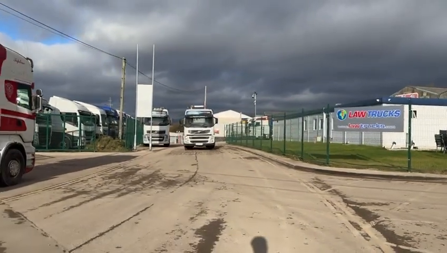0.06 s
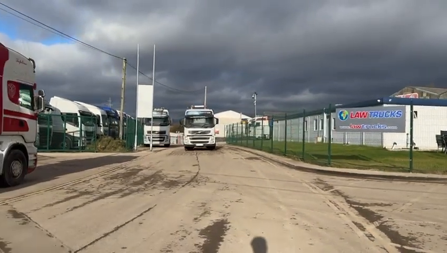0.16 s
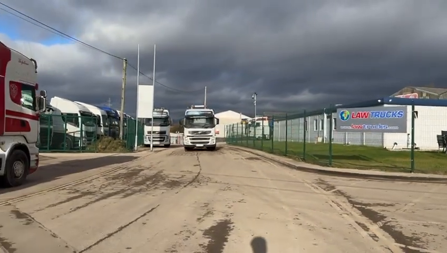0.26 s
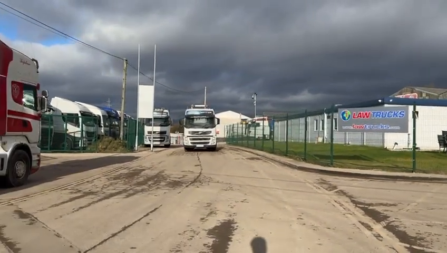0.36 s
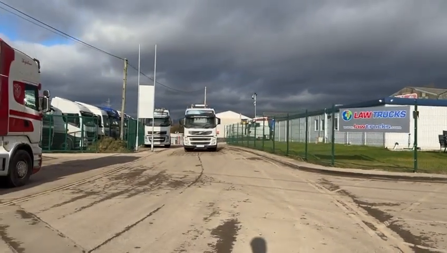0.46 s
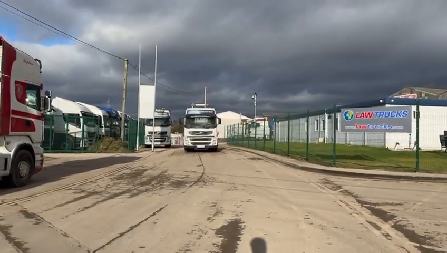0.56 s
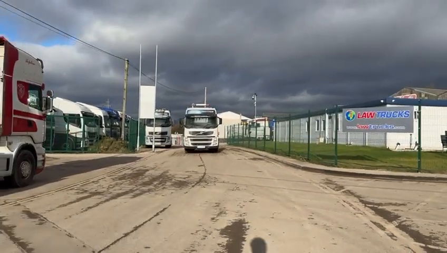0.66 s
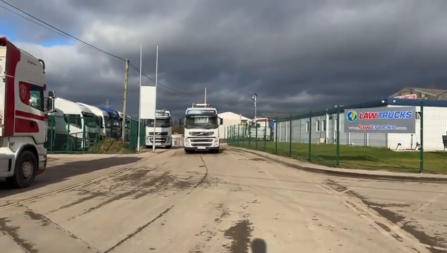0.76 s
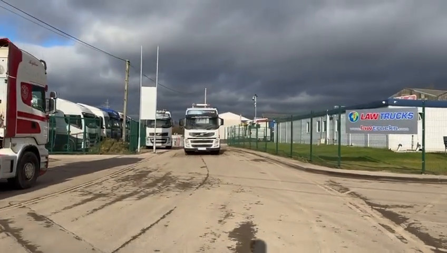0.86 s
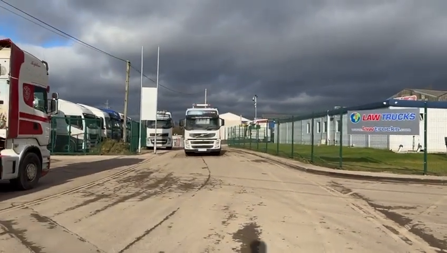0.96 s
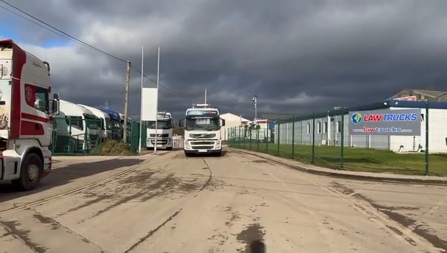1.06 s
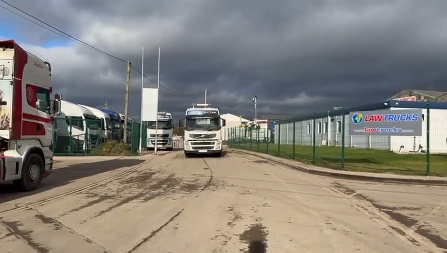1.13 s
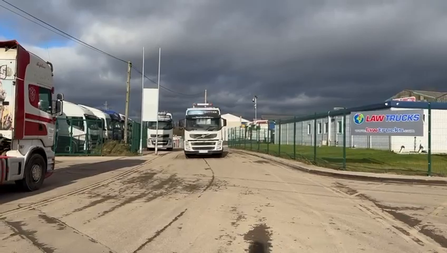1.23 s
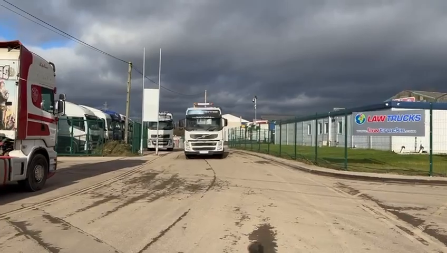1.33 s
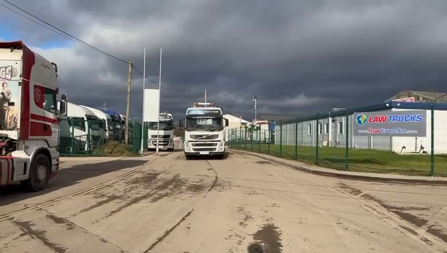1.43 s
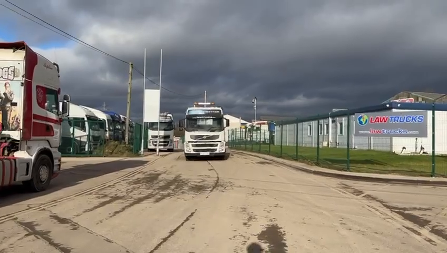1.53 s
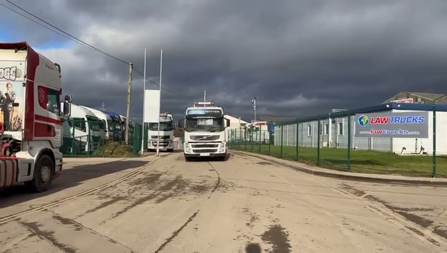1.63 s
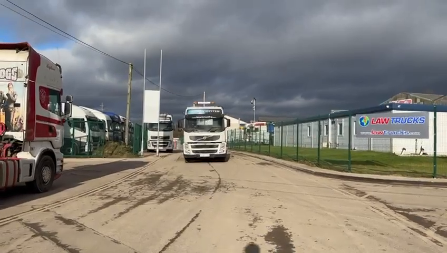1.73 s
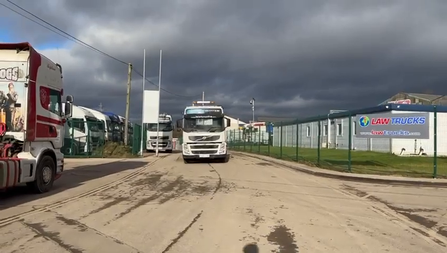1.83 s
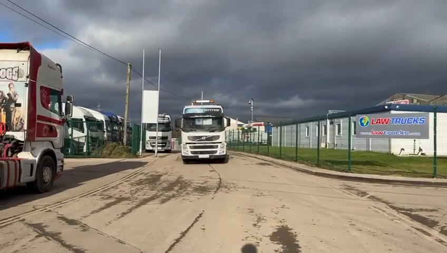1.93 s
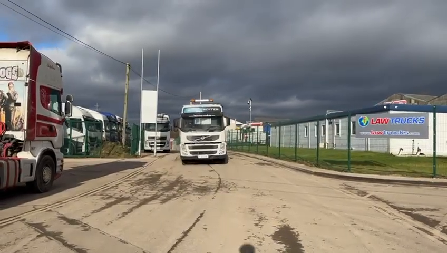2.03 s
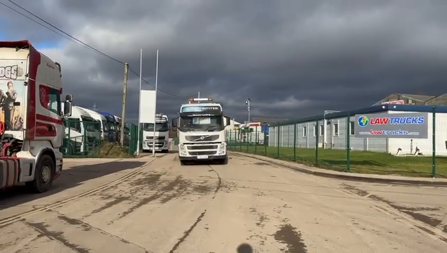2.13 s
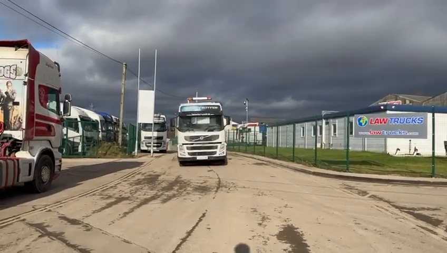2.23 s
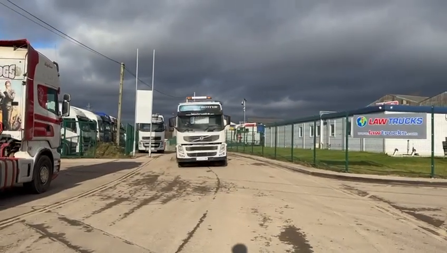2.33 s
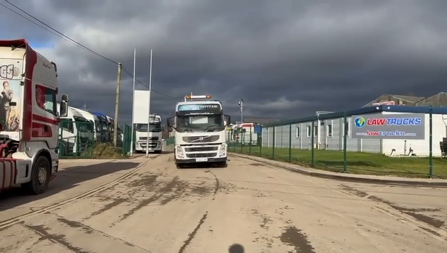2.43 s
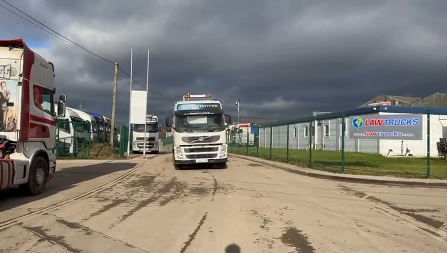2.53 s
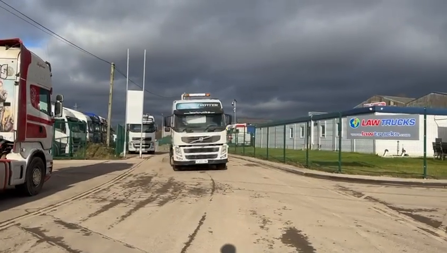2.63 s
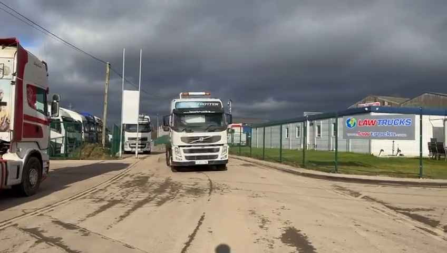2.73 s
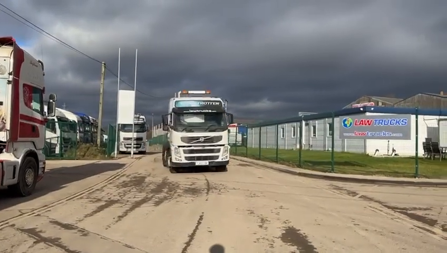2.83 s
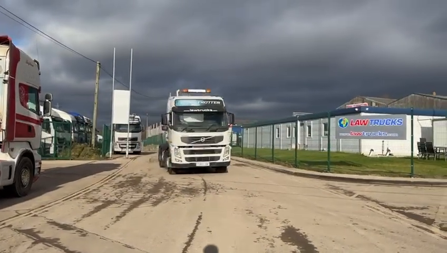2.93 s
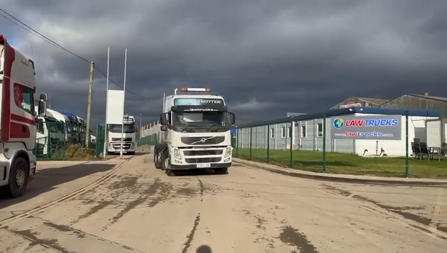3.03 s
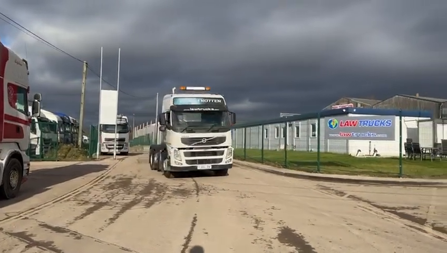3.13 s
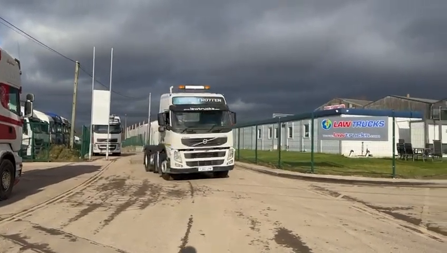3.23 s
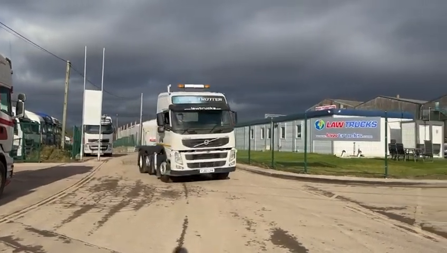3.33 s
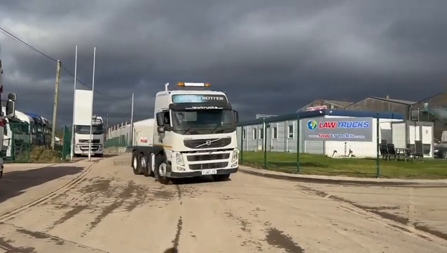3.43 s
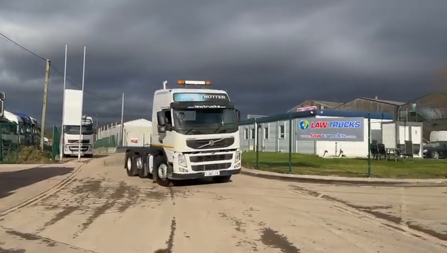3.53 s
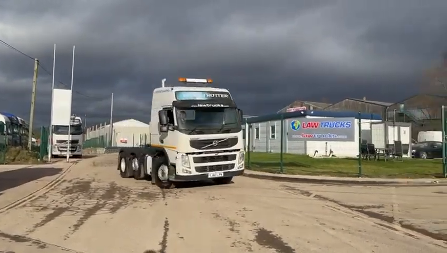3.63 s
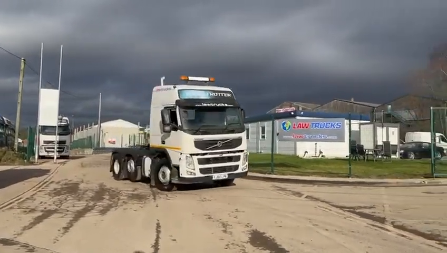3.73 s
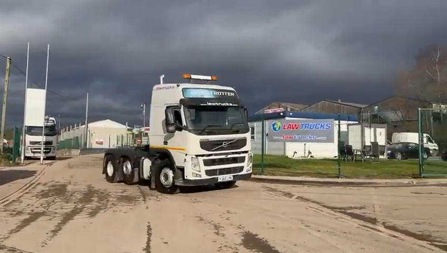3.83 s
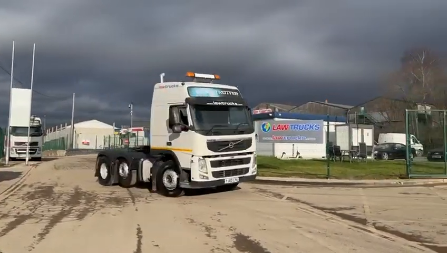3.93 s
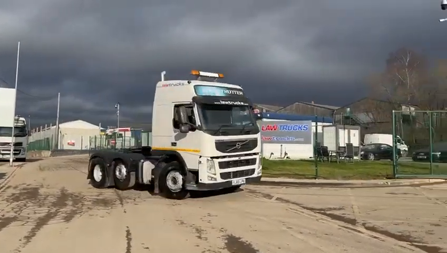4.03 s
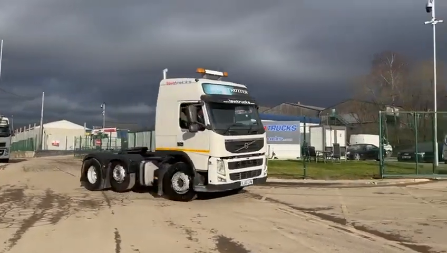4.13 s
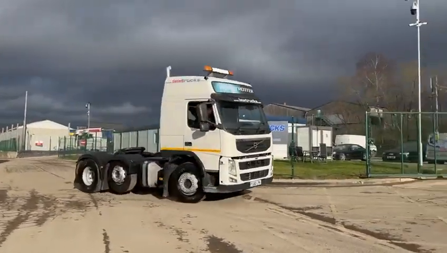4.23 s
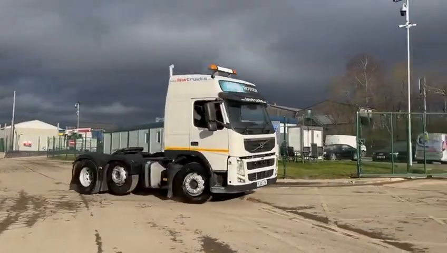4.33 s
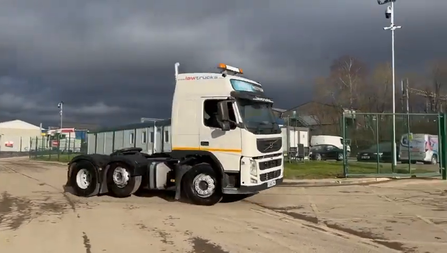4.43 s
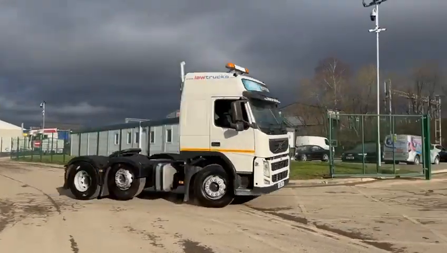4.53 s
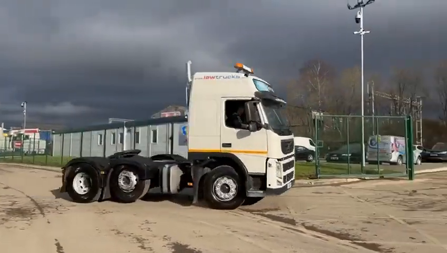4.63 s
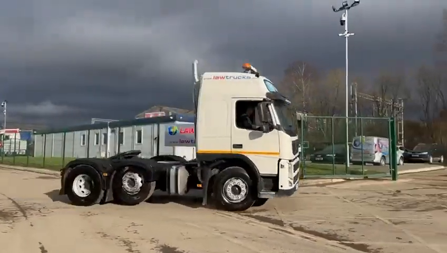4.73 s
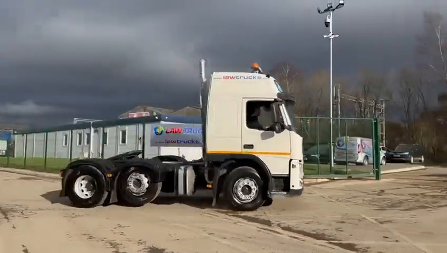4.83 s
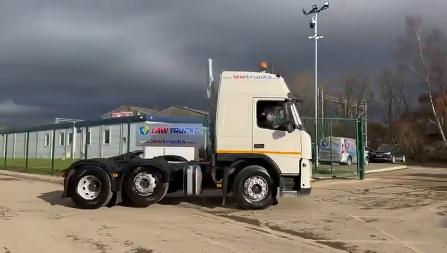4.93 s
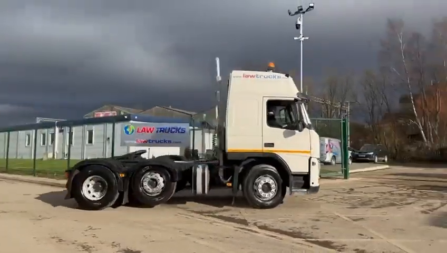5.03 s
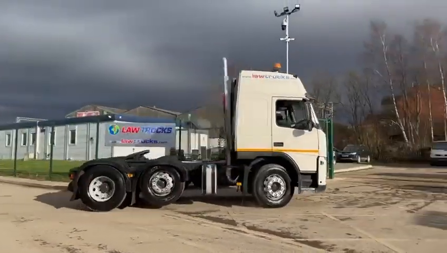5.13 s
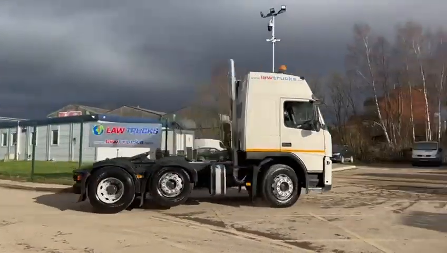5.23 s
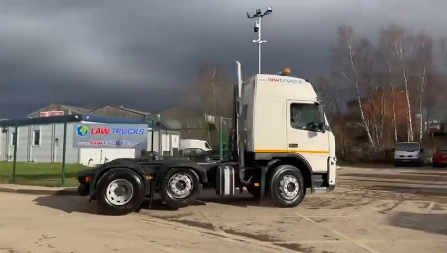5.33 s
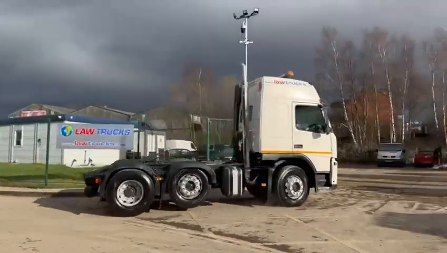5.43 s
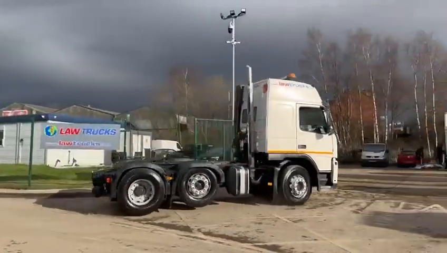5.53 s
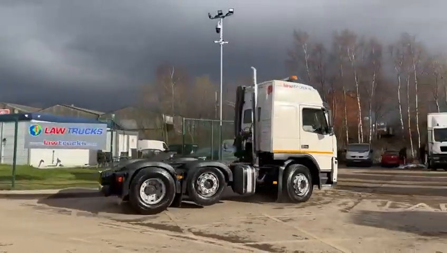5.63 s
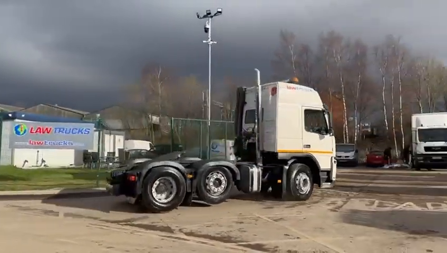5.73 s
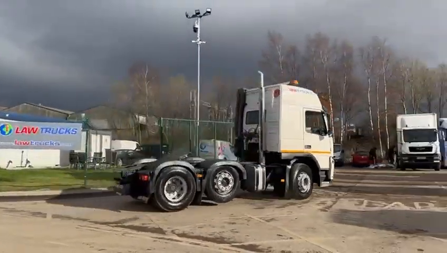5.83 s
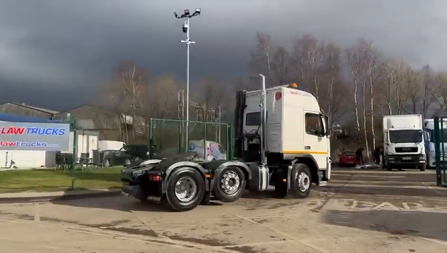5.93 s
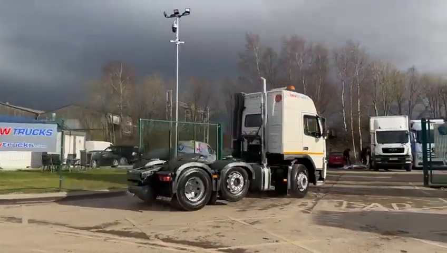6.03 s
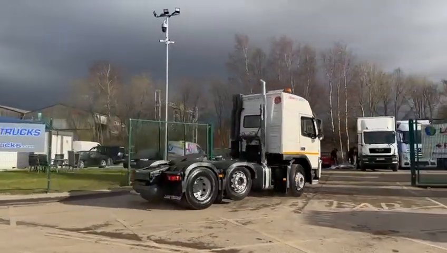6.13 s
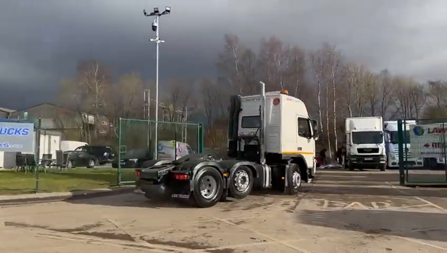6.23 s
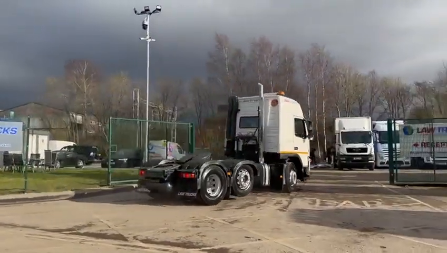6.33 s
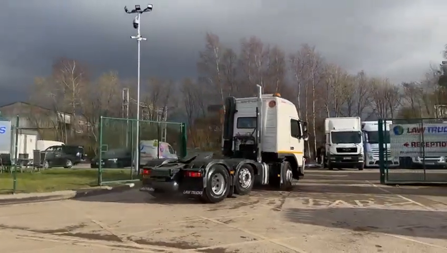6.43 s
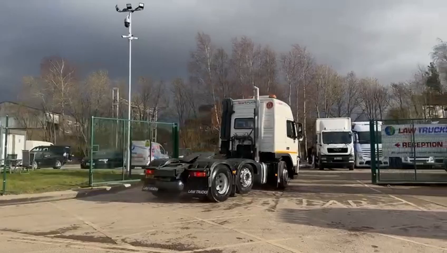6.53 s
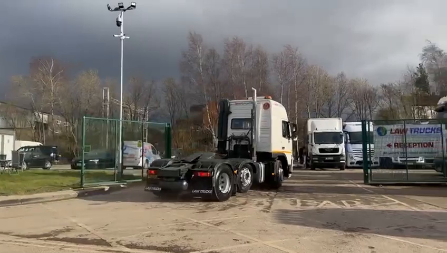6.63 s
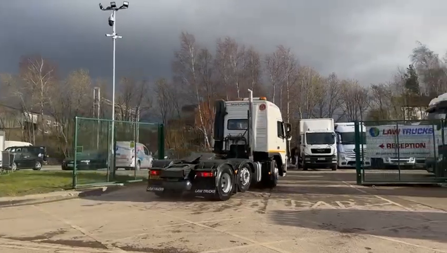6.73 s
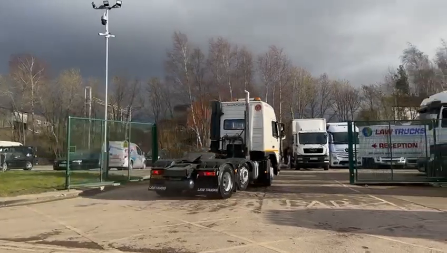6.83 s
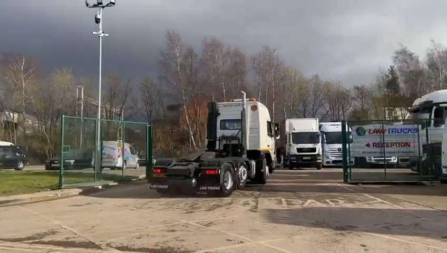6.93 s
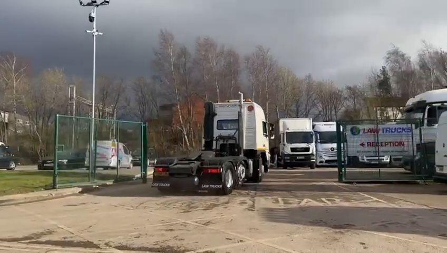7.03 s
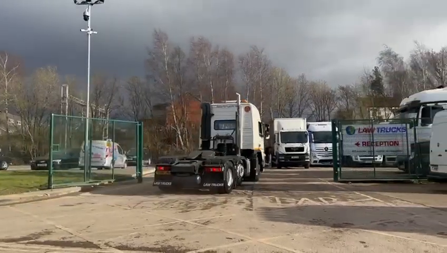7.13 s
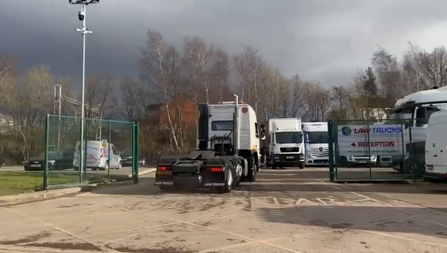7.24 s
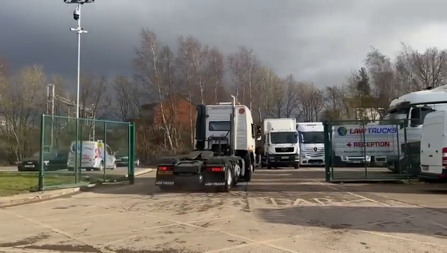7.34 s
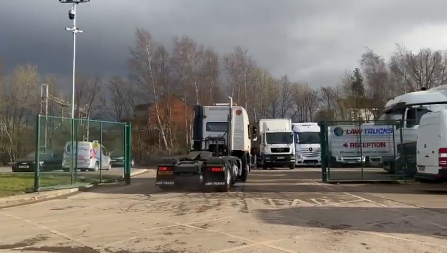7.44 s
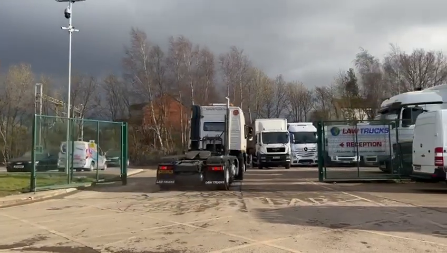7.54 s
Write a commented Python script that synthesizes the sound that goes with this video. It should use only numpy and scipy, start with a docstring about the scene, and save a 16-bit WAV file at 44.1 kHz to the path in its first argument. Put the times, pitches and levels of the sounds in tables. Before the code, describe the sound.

Outdoors in a concrete yard, a heavy diesel lorry approaches, revving hard in low gear. It eases off with sharp air hisses and two short, mid-pitched horn toots that slap back off sheds. Dull chassis knocks accompany a gear change, then the engine pulls strongly past a handheld stereo microphone about five metres away and slows as it leaves.

```python
"""Heard first: a diesel lorry driving hard in low gear; two toots and hisses of air; it passes and idles.
The yard is concrete, the closest distance about 5 m, and the microphone has two ports.
Engine and air are shaped noise bursts, hiss and gliding tones, with level set by distance and effort.
The horn is a stack of rough partials thrown back by sheds; chassis knocks are short noise thuds.
A low bed of tyres and breeze lies underneath."""
import sys
import numpy as np
from scipy import signal
from scipy.fft import rfft, irfft
from scipy.io import wavfile
from scipy.ndimage import uniform_filter1d

SR = 44100
rng = np.random.default_rng(int(sys.argv[2]) if len(sys.argv) > 2 else 0)


def generate_wav(signal):
    """Clip the signal to [-1, 1] and save it as 16-bit WAV at the path in sys.argv[1]."""
    frames = np.transpose(np.atleast_2d(signal))
    scaled = np.clip(frames, -1, 1) * 32767
    pcm = np.round(scaled).astype(np.int16)
    wavfile.write(sys.argv[1], SR, pcm)


N = 333837
T = np.arange(N) / SR
HZ = np.fft.rfftfreq(N, 1 / SR)


# cylinders in firing order: silencer_db, block_db (block_db is scaled down for the lighter parts)
CYLINDERS = [(-1, 4.2), (-1.5, 1.8), (-1, 4.2), (-4, 2.5), (-2.5, 4.5), (-2.5, 2)]
# silencer throb spectrum: freq_hz, level_db
THROB = [(70, -29.5), (125, 6.5), (148, -2.5), (178, 5), (215, -12.5), (250, -4), (330, 4.5), (400, -6),
         (460, -10.5), (560, -19), (900, -45)]
# engine block knock spectrum: freq_hz, level_db
BLOCK = [(250, -35.5), (420, -13), (520, -7), (630, 0.5), (780, 3.5), (950, 6), (1100, 5), (1280, -11),
         (1600, -9), (2500, -54.5)]
# injector clatter spectrum: freq_hz, level_db
CLATTER = [(600, -10), (1250, -24), (1480, 5), (1720, -2), (1980, 6), (2150, 5.5), (2350, 7), (2680, -0.5),
           (2950, 3.5), (3230, -1), (3720, 2.5), (4050, -3), (4400, -8), (6200, -8.5), (7400, -21),
           (8200, -13), (9200, -19), (11000, -35.5)]
# spectrum of the open bay behind the cab: freq_hz, level_db
BAY = [(1600, -25), (2350, 1.5), (2700, -14.5), (3600, -15), (4080, 2), (4450, -15.5), (5100, -7),
       (5500, 1.5), (6100, -10), (6800, -28), (10000, -15.5)]
# front grille spectrum: freq_hz, level_db
GRILLE = [(300, -30.5), (430, 2.5), (500, 12), (570, 5), (680, -21.5), (900, -40)]
# gear noise spectrum: freq_hz, level_db
GEARS = [(1100, -50.5), (1350, 1), (1460, 8), (1580, -13), (1800, -32.5)]


def engine(firings):
    """Uneven firings drive the throb, knock and clatter; gear noise, drone, intake and exhaust join."""
    silencer_db, knock_db = np.transpose(CYLINDERS)
    throb = blows(firings, silencer_db, decay=0.004, between=.45, alike=0.5, own=1.4)
    throb = coloured(throb, THROB, band=(135, 380))
    block = blows(firings, knock_db, decay=0.0028, between=1.4, alike=0.4, own=0.8)
    block = coloured(block, BLOCK, band=(860, 1160))
    ticks = blows(firings, .3 * knock_db, decay=0.0016, between=3.0, alike=0.15, own=0.6)
    clatter = coloured(ticks, CLATTER, band=(2000, 4000)) * loudness("injectors")
    bay = blows(firings, .5 * knock_db, decay=0.0045, between=2.1, alike=0.32, own=0.94)
    clatter += coloured(bay, BAY) * loudness("bay")  # heard side-on
    grille = blows(firings, 0.28 * knock_db, decay=0.0075, between=1.8, alike=0.54, own=0.98)
    grille = coloured(grille, GRILLE)
    gears = coloured(rng.standard_normal((2, N)), GEARS)

    sound = throb * loudness("throb") + block * loudness("block")
    sound += patchy(clatter, depth_db=2.2, patch_hz=170, patch_s=.16)
    sound += grille * loudness("grille") + gears * loudness("gears")
    sound[0] += drone(firings) * loudness("drone") + chug(firings)
    return sound + exhaust(firings)


# engine speed: time_s, firings_per_s
SPEED = [(0.0, 56.3), (0.42, 57.86), (0.8, 49.14), (1.0, 45.62), (1.3, 36.67), (1.7, 36.29), (1.97, 56.3),
         (2.6, 56.97), (3.35, 57.52), (3.7, 55.89), (4.3, 55.34), (5.05, 52.04), (5.8, 50.5), (6.0, 47.24),
         (6.35, 45.6), (7.2, 33.26), (7.57, 31.04)]
STRONG_FIRING_S = 4.947  # a firing of the cycle's first cylinder


def crank():
    """Running count of firings from a slightly unsteady engine speed, zero at a cycle start."""
    firings = np.cumsum(curves(SPEED)[0] * (1 + .0015 * wander(8))) / SR
    return firings - np.interp(STRONG_FIRING_S, T, firings)


def blows(firings, strength_db, decay, between, alike, own):
    """A noise swell a firing: part common to all cylinders, part each one's own, the rest fresh."""
    count = np.floor(firings).astype(int)
    cylinder = count % len(strength_db)
    new_firing = np.diff(count, prepend=count[0]) != 0
    first = np.maximum.accumulate(np.arange(N) * new_firing)
    age = np.arange(N) - first  # samples since the firing
    rings = rng.standard_normal((len(strength_db) + 1, SR))
    burst = alike * rings[-1, age] + own * rings[cylinder, age] + rng.standard_normal((2, N))
    force = amp(strength_db[cylinder] + .5 * rng.standard_normal(N)[first])
    swell = age / SR / decay
    return burst * force * (between + swell * np.exp(1 - swell))


# exhaust boom at twice the firing rate, before a slight lift and wander: time_s, level_db
BOOM = [(0.09, -27.2), (0.23, -16.0), (0.52, -23.3), (0.61, -33.5), (0.72, -23.6), (0.95, -37.8),
        (1.9, -37.5), (2.45, -26.4), (3.0, -26.9), (3.5, -38.8), (3.76, -15.7), (4.07, -16.1),
        (4.45, -26.4), (4.85, -16.6), (5.2, -16.6), (5.9, -25.3), (6.25, -37.1), (6.8, -40.3),
        (7.13, -33.5), (7.18, -25.2), (7.57, -23.0)]


def exhaust(firings):
    """The tailpipe booms at one and two times the firing rate; reflections shift its port phase."""
    turn = 2 * np.pi * firings
    low = loudness("tailpipe") * amp(2.0 * wander(17)) * np.exp(1j * turn)
    high = amp(curves(BOOM)[0] + 0.2 + 1.1 * wander(21)) * np.exp(2j * turn)
    boom = np.sqrt(2) * (low + high)
    return np.array([boom.imag, boom.real * 0.06 * wander(3)])


# droning orders: vibrations_per_cycle (six firings), low_gear_db, high_gear_db (at the beam's peak),
# beam_s (when the beam crosses the microphone)
DRONE = [(16, -11, -15, 5), (18, -4, 0, 5.5), (20, -8, -10, 5), (22, -4, 1.5, 4.8), (24, -3, 0, 5.6),
         (26, -16, 2, 4), (27, -25, -4, 4.7), (28, -6, -14, 5.5), (30, -10, -3, 5.2), (32, -.5, -6, 4.4),
         (33, -20, -11, 5.5), (36, -2.5, -9, 5.6), (37, -22, -10, 4.7), (38, -20, -8, 5.45),
         (40, -3.5, -3, 4), (42, -9, -14, 5.7), (44, -18, -10, 5.6), (52, -5, -14, 3), (60, -5, -8, 3)]
# silencer resonances the orders glide through: freq_hz, level_db
SILENCER = [(105, 1), (125, 0.5), (150, 3.5), (170, 1), (192, -3), (225, -3), (243, -3), (262, 2), (290, 0),
            (340, 5), (400, -3.5), (450, -10)]
BEAM_DB, BEAM_S = 12, .65  # depth; time either side of the peak to lose 63% of that depth


def drone(firings, fading_db=2.5):
    """Orders sing out at silencer resonances; each gear has its pattern, each high-gear order its beam."""
    cycle_hz = curves(SPEED)[0] / 6
    low_gear = gate(-1, SHIFT_S, SHIFT_FADE_S)
    sound = np.zeros(N)
    for k, low_db, high_db, beam_s in DRONE:
        passing_db = high_db - BEAM_DB * (1 - np.exp(-((T - beam_s) / BEAM_S) ** 2))
        gear_db = passing_db + (low_db - passing_db) * low_gear
        db = gear_db + read(SILENCER, k * cycle_hz) + fading_db * wander(3.4)
        turn = 2 * np.pi * (k * firings / 6 + rng.random())
        sound += amp(db) * np.sqrt(2) * np.sin(turn)
    return sound


# intake gulps on successive firings: level_db
GULP_DB = [0, -6, -17]
GULP_HZ, GULP_S = 365, .0062  # pitch; time from the peak to 1/e


def chug(firings):
    """Once a cycle the intake gulps sharply, and more weakly on the next firings."""
    sound = np.zeros(N)
    for place, db in enumerate(GULP_DB):
        t = ((firings - place + 3) % 6 - 3) / curves(SPEED)[0]  # seconds from the nearest gulp
        pulse = np.exp(-(t / GULP_S) ** 2)
        sound += amp(db) * pulse * np.cos(2 * np.pi * GULP_HZ * t + .3 * wander(47))
    return sound * loudness("intake") * amp(1.3 * wander(13))


def patchy(x, depth_db, patch_hz, patch_s):
    """Reflections shift as the lorry moves, so that patches of the spectrum swell and thin."""
    hz, t, z = signal.stft(x, SR, nperseg=1024)
    bins = max(1, round(patch_hz / hz[1]))
    frames = max(1, round(patch_s / t[1]))
    field = uniform_filter1d(rng.standard_normal(z.shape[1:]), bins, axis=0)
    field = uniform_filter1d(field, frames, axis=1)
    return signal.istft(z * amp(depth_db * evened(field)), SR, nperseg=1024)[1][:, :N]


# parts of the lorry, as heard passing under load in high gear at 55 firings a second:
# level_db, distance_exponent, db_per_speed_doubling, pedal_up_db, low_gear_db, end_on_db
PARTS = {"tailpipe": (-25.5, 1, -5.5, -17.5, 5, -2), "throb": (-32, 1.0, 13, 1, 10, 1),
         "drone": (-28.5, 1.64, 15, 3, 20.5, -0.5), "intake": (-15, 2.3, 7.5, -9, 5, 9),
         "block": (-32, 0.68, 10, -5, 7, 1.5), "injectors": (-39.5, 0.5344, 2.5, -3, 5, 0.5),
         "bay": (-46.5, 4, 6.5, -11, -4, -23.5), "grille": (-45.5, 0.7, 18, 3, -4.5, 15.5),
         "gears": (-53, .5, 10, 9, -1, 2.5), "turbo": (-53, 2, 6, -5, 28, 8.5)}
# pedal down: start_s, end_s
PULLS = [(-.3, 0.49), (1.9, 5.86)]
# the engine goes slack between gears: start_s, end_s, level_db
CLUTCH = (1.74, 1.95, -5)
CLOSEST_S, CLOSEST_M, DRIVE_M_PER_S = 5.364, 4.84, 5.58  # straight pass by the microphone
PEDAL_S = 0.079  # softness of the load coming or going
SHIFT_S, SHIFT_FADE_S = 1.9, 0.052  # low gear until here; softness of the change


def loudness(part):
    """Gain of one part from its distance and angle to the microphone, engine speed, pedal and gear."""
    db, spreading, speed_db, coasting_db, low_gear_db, end_on_db = PARTS[part]
    along = DRIVE_M_PER_S * (T - CLOSEST_S)
    distance = np.hypot(along, CLOSEST_M)
    doublings = np.log2(curves(SPEED)[0] / 55)
    coasting = 1 - sum(gate(start, end, PEDAL_S) for start, end in PULLS)
    low_gear = gate(-1, SHIFT_S, SHIFT_FADE_S)
    slack_db = CLUTCH[2] * gate(CLUTCH[0], CLUTCH[1], .025)
    effort_db = speed_db * doublings + coasting_db * coasting + low_gear_db * low_gear + slack_db
    angle_db = end_on_db * (along / distance) ** 2
    return amp(db + effort_db + angle_db) * (CLOSEST_M / distance) ** spreading


# horn toots: start_s, length_s, level_db, fundamental_sag_db_per_s, release_s (fundamental)
TOOTS = [(1.053, .184, -1.5, 72, 0.032), (1.513, 0.134, -1, 52, 0.014)]
# horn partials, one list a toot: multiple, level_db
PARTIALS = [
    [(1, 0), (2, -14), (3, -31), (4, -24), (5, -33), (6, -29), (7, -29.5), (8, -33), (9, -31.5), (10, -42),
     (11, -38.5), (12, -41), (13, -45), (14, -47), (15, -34), (16, -43), (17, -35.5), (18, -36),
     (19, -43.5), (20, -39), (21, -36), (22, -38), (23, -43.5), (24, -45), (25, -44)],
    [(1, -2), (2, -12), (3, -25), (4, -22.5), (5, -42.5), (6, -24), (7, -25), (8, -31.5), (9, -34.5),
     (10, -36), (11, -32.5), (12, -35.5), (13, -32.5), (14, -39), (15, -36), (16, -36), (17, -29),
     (18, -28), (19, -35), (20, -36), (21, -37), (22, -40), (23, -37.5), (24, -36.5), (25, -36)],
]


def horn():
    """Two toots and their return from the yard."""
    direct = sum(toot(row, partials) for row, partials in zip(TOOTS, PARTIALS))
    return direct * np.array([[1], [.25]]) + yard_echo(direct, t60=0.44, wet_db=-19)


HORN_HZ, TOOT_RISE_S = 405.9, .012  # settled pitch; attack time
# largest changes, approached by the highest partials
SWAY_DB, UPPER_SAG_DB_PER_S = 3.2, 18
BITE_DB, BITE_S = 5.5, .02  # overshoot at the start and its decay
BUZZ, BUZZ_HZ = .2, 130  # roughness depth while the note holds; its bandwidth


def toot(row, partials):
    """A buzzing diaphragm starts a little sharp and raspy, then settles on its note."""
    start, length, db, sag, release = row
    span = (T >= start) & (T < start + .5)
    t = T[span] - start
    after = np.maximum(t - length, 0)
    sharp_start = .022 * np.exp(-t / .012)
    sharp_end = .025 * (1 - np.exp(-after / .014))
    hz = HORN_HZ * (1 + sharp_start + sharp_end + .0013 * wander(60)[span])
    turn = 2 * np.pi * np.cumsum(hz) / SR
    k, partial_db = np.transpose(partials)[:, :, None]
    # as the lorry moves, reflections swell and thin each upper partial at its own pace
    pace, offset, phase = rng.random((3, *k.shape))
    sway = np.sin(2 * np.pi * ((4 + 9 * pace) * t + offset))
    # they also overshoot as the diaphragm starts, then sink
    bite_db = BITE_DB * np.exp(-t / BITE_S)
    upper_db = (1 - 1 / k) * (SWAY_DB * sway + bite_db - UPPER_SAG_DB_PER_S * (t - .08))
    # the low partials sag; the high ones stop first when the contact opens
    shape = amp(partial_db + upper_db - sag * (t - .08) / k)
    shape *= np.exp(-after * k ** 0.21 / release)
    # the contact chatters, roughening the upper partials, most of all as the note breaks off
    chatter = rng.standard_normal((2, len(k), len(t)))
    chatter = signal.lfilter(*signal.butter(2, BUZZ_HZ, fs=SR), chatter)
    depth = BUZZ * (1 - 1 / k) ** 2 * (1 + 2 * (1 - np.exp(-after / .01)))
    rough = 1 + depth * (evened(chatter[0]) + 1j * evened(chatter[1])) / np.sqrt(2)
    spin = np.exp(1j * (k * turn + 2 * np.pi * phase * (k > 2)))
    tone = np.sqrt(2) * (shape * rough * spin).real.sum(0)
    rasp = coloured(rng.standard_normal(N), AIR)[span] * (1 + np.cos(turn))
    rasp *= amp(-14) * np.exp(-t / 0.016) + amp(-37) * np.exp(-((t - length) / 0.04) ** 2)
    sound = np.zeros(N)
    sound[span] = amp(db) * (tone + rasp) * (1 - np.exp(-(t / TOOT_RISE_S) ** 2))
    return sound


# slaps off the sheds: delay_s, level_db, dull_above_hz
ECHOES = [(.033, -20, 5000), (.072, -18, 2600), (.15, -30, 1800), (.29, -29, 1200)]


def yard_echo(x, t60, wet_db):
    """Slaps off the sheds, duller from farther away, and a sparse tail, different in each row."""
    t = T[:SR]
    sparse = rng.random((2, SR)) < .05
    tail = rng.standard_normal((2, SR)) * sparse * amp(-60 * t / t60) * (t > .012)
    tail *= amp(wet_db) / np.linalg.norm(tail[0])  # level before the band filter
    tail = signal.lfilter(*signal.butter(2, [300, 3400], "band", fs=SR), tail)
    for delay, db, dull_hz in ECHOES:
        slap = signal.unit_impulse(SR, int(delay * SR))
        tail[0] += amp(db) * signal.lfilter(*signal.butter(2, dull_hz, fs=SR), slap)
    return signal.fftconvolve(x[None], tail, axes=1)[:, :N]


# hiss spectrum of escaping air, turbo and horn rasp: freq_hz, level_db
AIR = [(1200, -29), (2800, 2.5), (4000, 6.5), (6200, 4.5), (7400, -2), (8400, 4), (9500, -7), (11000, -12)]
# compressed air let out by the valves: start_s, end_s, level_db, edge_s
VENTS = [(0.448, 0.787, -39.5, 0.12), (0.838, 1.154, -41.5, 0.057), (1.397, 2.035, -51, 0.028),
         (6.25, 7.315, -57.5, 0.078)]


def air():
    """The turbo hisses under load, and compressed air escapes from the valves."""
    venting = sum(amp(db) * gate(start, end, edge) for start, end, db, edge in VENTS)
    hiss = coloured(rng.standard_normal((2, N)), AIR)
    return hiss * np.hypot(loudness("turbo"), venting) * amp(1.1 * wander(19))


# chassis knocks: start_s, level_db, pitch_hz (near the band's top), decay_s
KNOCKS = [(0.189, -20, 403, 0.066), (1.208, -10, 256, 0.02), (1.463, -18.5, 234, 0.073),
          (1.697, -21.5, 295, 0.019), (1.933, -15, 417, 0.0067), (1.958, -19, 390, 0.0044),
          (1.998, -18, 192, 0.023), (2.36, -20.5, 111, 0.014), (2.414, -16.5, 123, 0.0093),
          (3.109, -23.5, 179, 0.045), (6.361, -21.5, 123, 0.025)]


def chassis():
    """Dull knocks of the unladen frame over bumps: band-limited noise that dies away."""
    sound, t = np.zeros((2, N)), T[:SR // 4]
    for s, db, hz, decay in KNOCKS:
        band = signal.butter(2, [hz / 3, hz * 1.18], "band", fs=SR, output="sos")
        thud = signal.sosfilt(band, rng.standard_normal((2, len(t))))
        thud *= np.exp(-t / decay) * (1 - np.exp(-t / 0.0008))
        thud *= np.sqrt(decay * SR / 2) / np.linalg.norm(thud[0])
        at = int(s * SR)
        sound[:, at:at + len(t)] += amp(db) * thud
    return sound


# tyre and breeze spectrum in the yard: freq_hz, level_db
YARD = [(20, -18.5), (45, -1.5), (80, 8.5), (160, 3), (400, -2.5), (550, -6.5), (700, -11), (1100, -15),
        (2500, -26.5), (9000, -46)]


def rumble():
    """Tyres and breeze make a low, lumpy bed."""
    return coloured(rng.standard_normal((2, N)), YARD) * amp(-33.0 + 2.5 * wander(27))


# phase between the microphone ports: freq_hz, left_lead_rad
PORT_PHASE = [(300, 0), (560, 1.1), (780, .1), (1000, .4), (1300, 2.6), (1650, 2.4), (1900, 0), (2300, 0),
              (2600, .7), (2850, .1), (3400, .45), (4400, .6), (5300, .25), (6750, .4), (7350, 2.8),
              (7700, 3.6), (7950, 5.7), (8600, 6.1), (9450, 5.7), (9900, 3.6)]
# likeness of the ports: freq_hz, likeness (0 to 1)
PORT_LIKENESS = [(100, 0.79), (200, 0.84), (380, 0.94), (560, 0.95), (680, 0.36), (900, 0.96), (1200, 0.75),
                 (1450, 0.66), (2200, 0.8), (2750, 0.55), (4000, 0.87), (4800, 0.47), (5700, 0.98),
                 (7000, 0.39), (7800, 0.44), (8400, 1)]
# balance of the ports: freq_hz, left_minus_right_db
PORT_BALANCE = [(200, 0), (420, -1), (530, 1), (670, 3.5), (870, -0.5), (1100, -1), (1400, -3.5), (1800, 0),
                (3200, -2), (5000, 1), (7600, 0), (8500, -0.5)]


def ports(sound):
    """Row 0 is common, row 1 scattered; phase, likeness and level of left and right vary with frequency."""
    common, scattered = rfft(sound)
    like, phase = np.clip(read(PORT_LIKENESS), 0, .999), read(PORT_PHASE)
    side = np.array([[1], [-1]])  # left, right
    z = np.sqrt(1 + like) * common + side * np.sqrt(1 - like) * scattered
    z *= np.exp(.5j * side * phase) * amp(side * read(PORT_BALANCE) / 2)
    # level correction for likeness and phase
    opposed = np.minimum(like, .55) * np.minimum(np.cos(phase), 0)
    agreeing = like * np.maximum(np.cos(phase), 0)
    return irfft(z / np.sqrt(1 + opposed + agreeing), N)


def amp(db):
    """Decibels to gain."""
    return 10 ** (np.asarray(db) / 20)


def evened(x):
    """Scales to rms 1."""
    return x / np.sqrt(np.mean(x ** 2) + 1e-20)


def read(points, hz=HZ):
    """Reads a spectrum on a log-frequency axis."""
    f, value = np.transpose(points)
    return np.interp(np.log(hz + 1), np.log(f), value)


def curves(rows):
    """Each column of a time table, at every sample."""
    s, *columns = np.transpose(rows)
    return [np.interp(T, s, c) for c in columns]


def wander(rate_hz):
    """Random drift of rms 1, mostly slower than rate_hz."""
    return evened(irfft(rfft(rng.standard_normal(N)) / (1 + (HZ / rate_hz) ** 4), N))


def coloured(x, colour, band=(20, 11000)):
    """Gives x a spectrum, with rms 1 inside the band."""
    z = rfft(x) * amp(read(colour))
    inside = irfft(z * ((HZ > band[0]) & (HZ < band[1])), N)
    return irfft(z, N) / inside.std()


def gate(start, end, edge):
    """1 from start to end, with soft edges."""
    return (np.tanh((T - start) / edge) - np.tanh((T - end) / edge)) / 2


def scene():
    """The lorry in the yard, at the two microphone ports."""
    return ports(engine(crank()) + air() + horn() + chassis() + rumble())


EDGE_HZ = 10500  # top of the band


def record(dry):
    """Gain control ducks everything while the sound is loud; peaks are rounded off; then the band limit."""
    power = uniform_filter1d((dry ** 2).mean(0), size=500)
    power_db = 10 * np.log10(abs(power) + 1e-12)
    fall = T * 150  # recovery at 150 dB a second
    peak_db = np.maximum.accumulate(power_db + fall) - fall
    over_db = np.maximum(peak_db + 12.5, 0)
    settled_db = signal.lfilter(*signal.butter(1, 4, fs=SR), over_db)
    ducked = dry * amp(-.55 * uniform_filter1d(over_db, size=300) - .28 * settled_db)
    held = ducked / (1 + ducked ** 8) ** (1 / 8)
    band_limit = signal.firwin(401, EDGE_HZ, window=("kaiser", 9), fs=SR)
    return signal.oaconvolve(held, band_limit[None], "same")


dry = scene()
out = record(dry)
generate_wav(out)
```